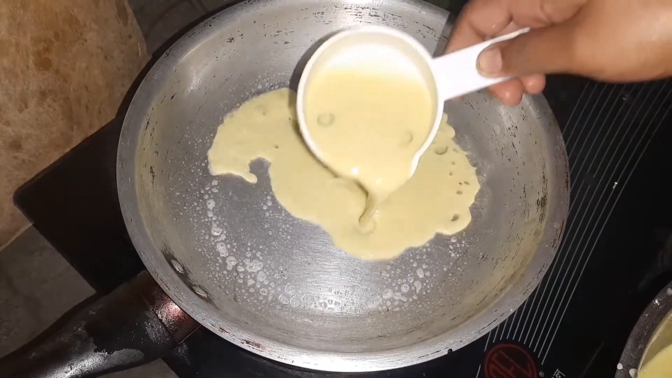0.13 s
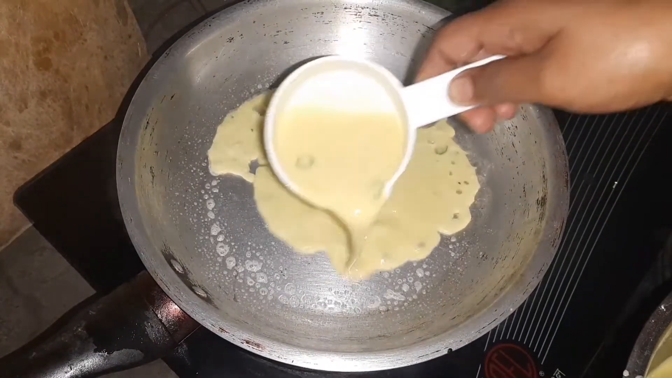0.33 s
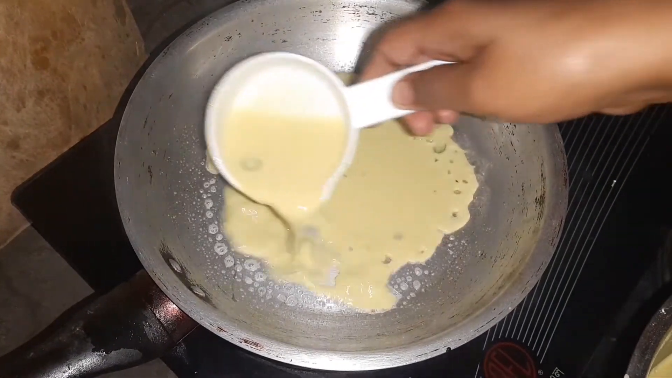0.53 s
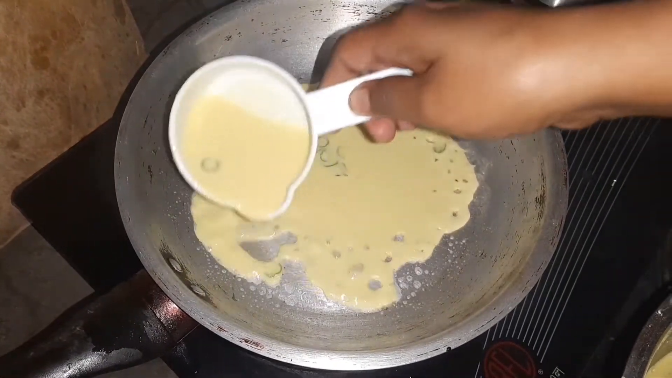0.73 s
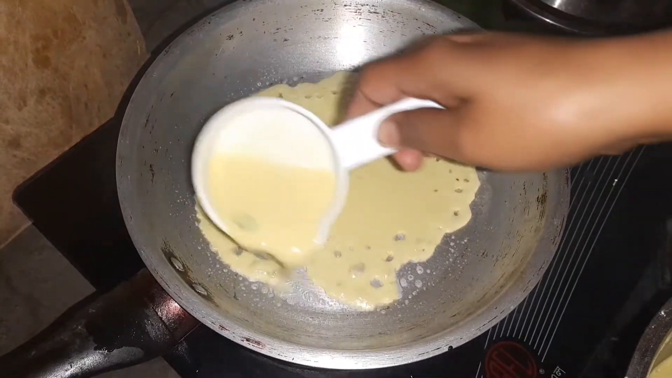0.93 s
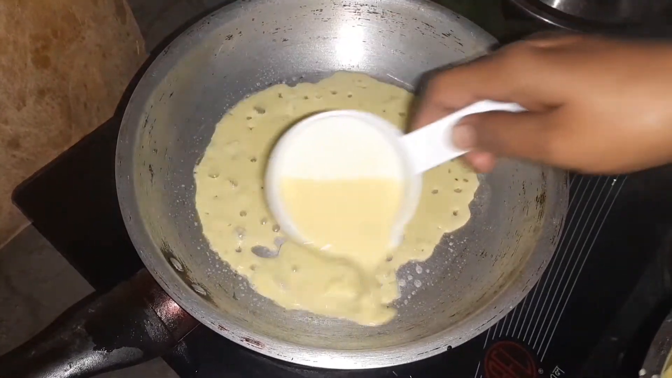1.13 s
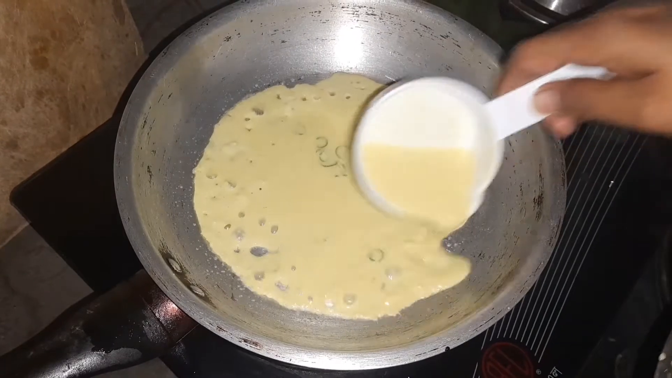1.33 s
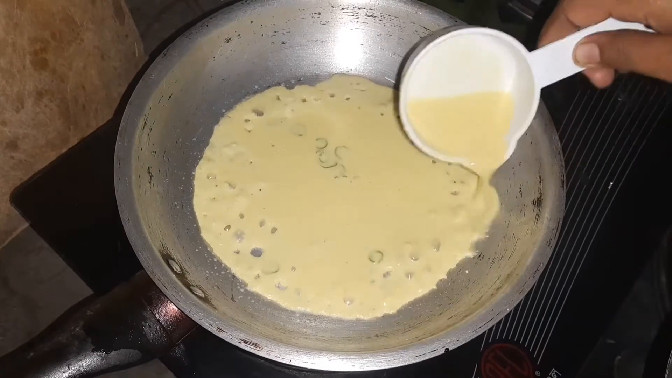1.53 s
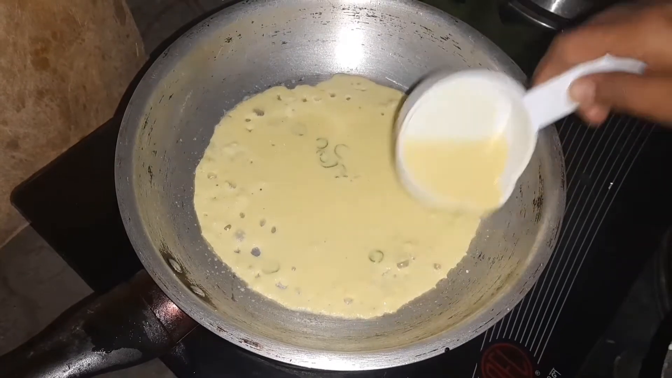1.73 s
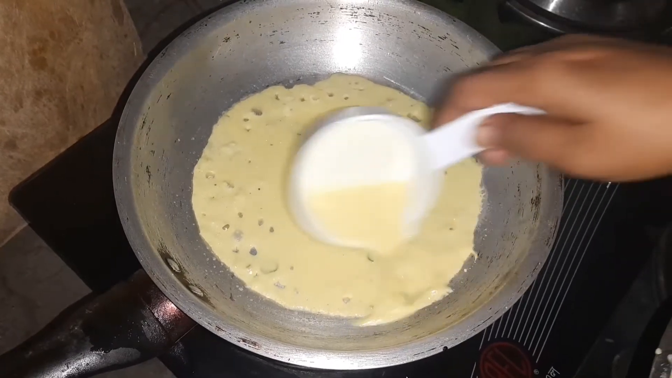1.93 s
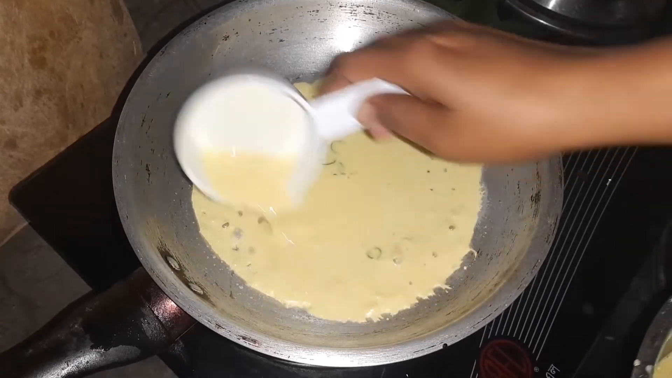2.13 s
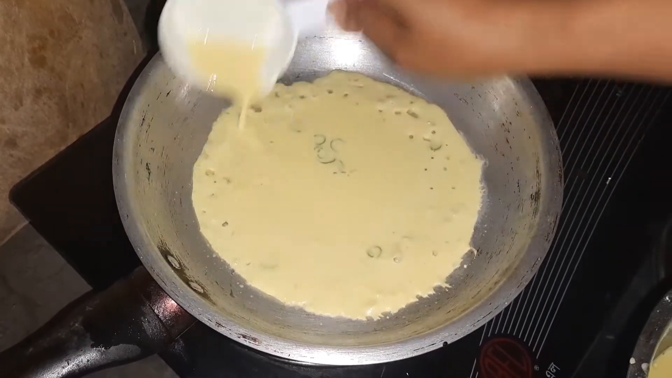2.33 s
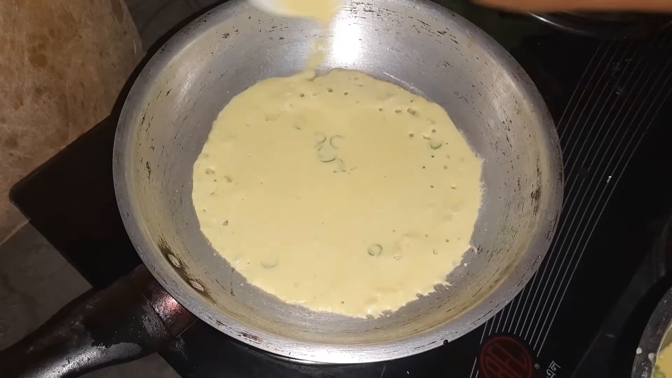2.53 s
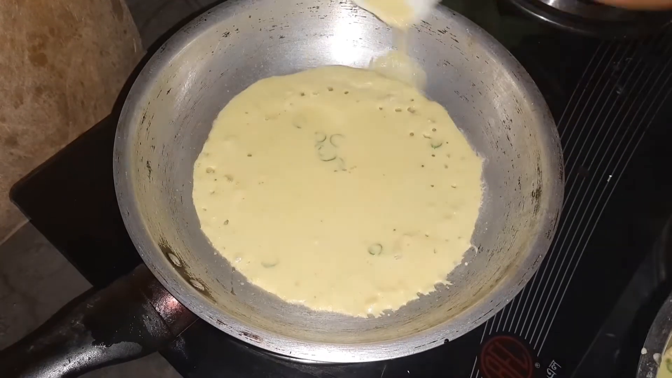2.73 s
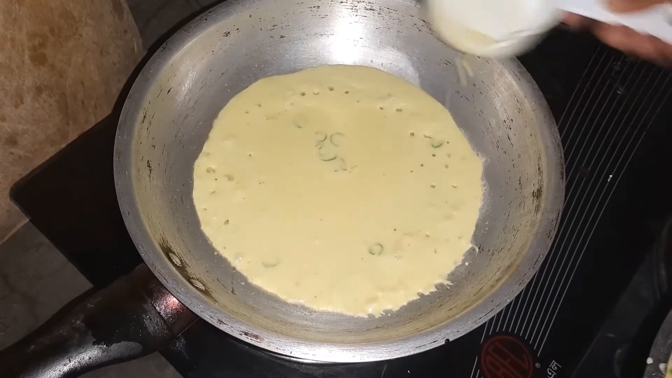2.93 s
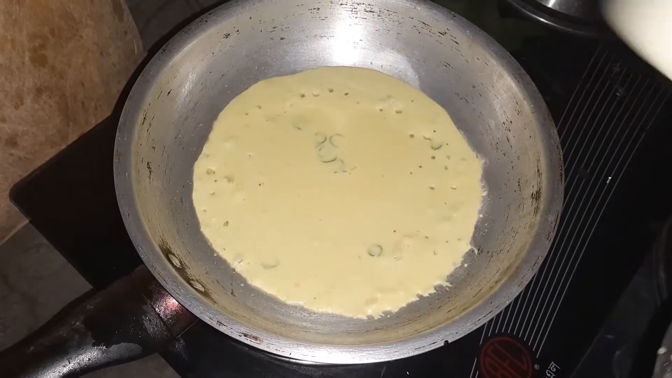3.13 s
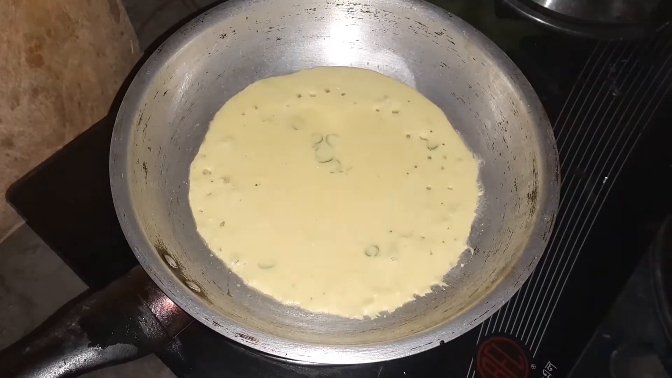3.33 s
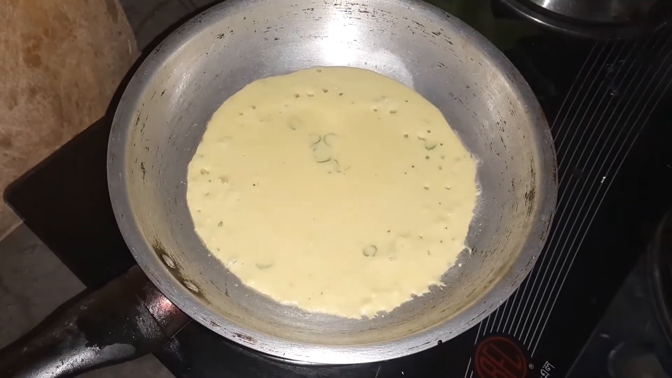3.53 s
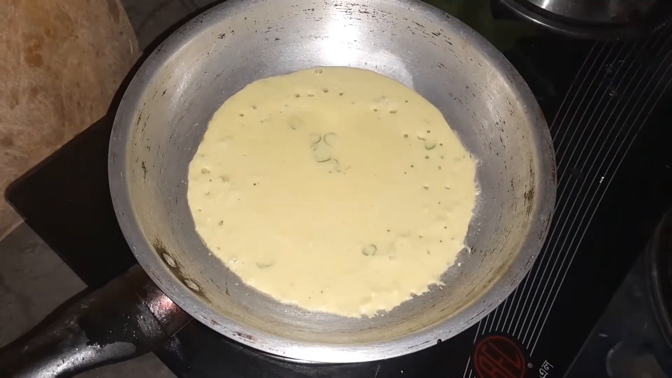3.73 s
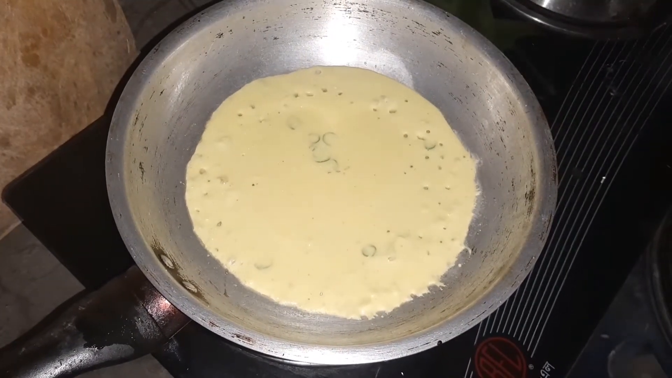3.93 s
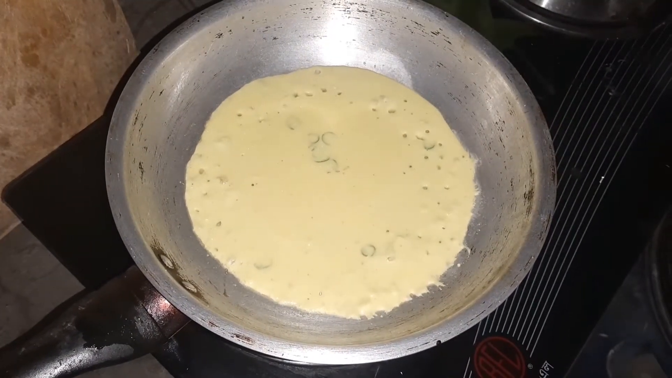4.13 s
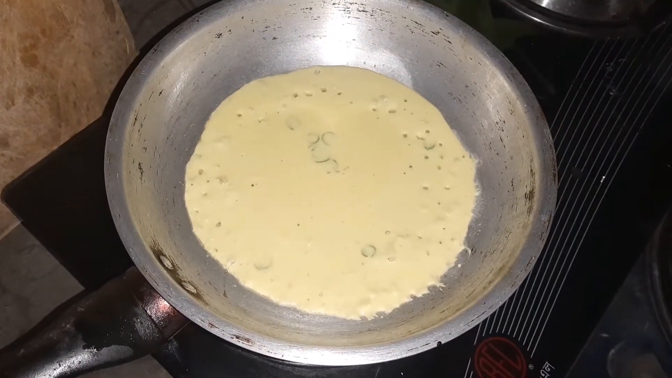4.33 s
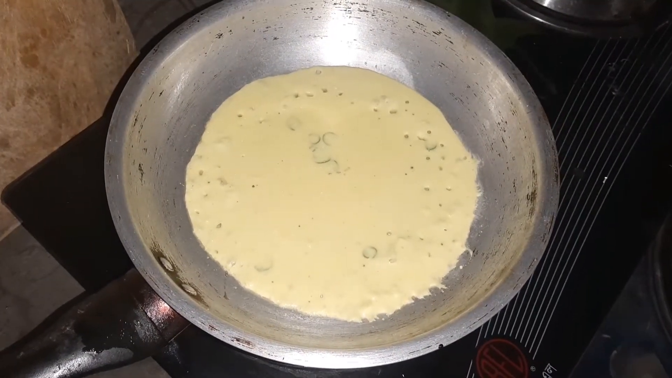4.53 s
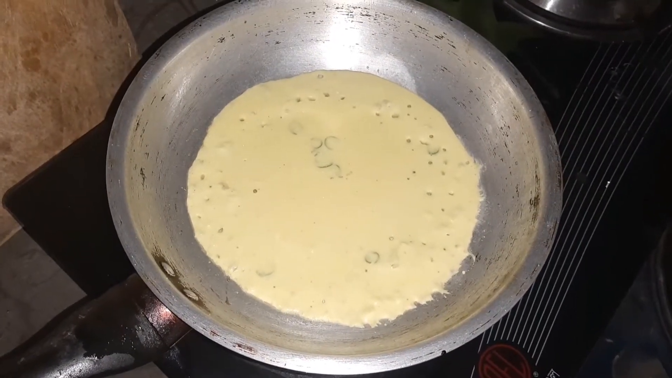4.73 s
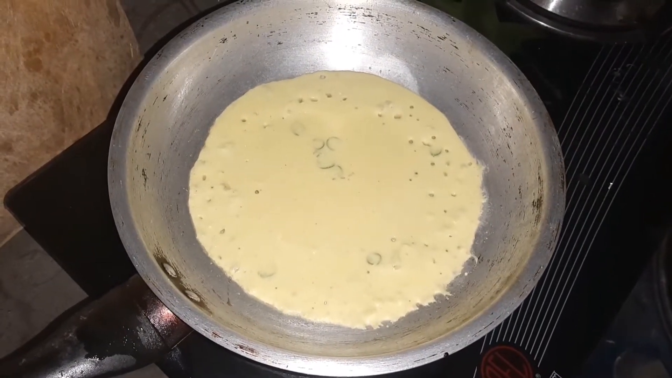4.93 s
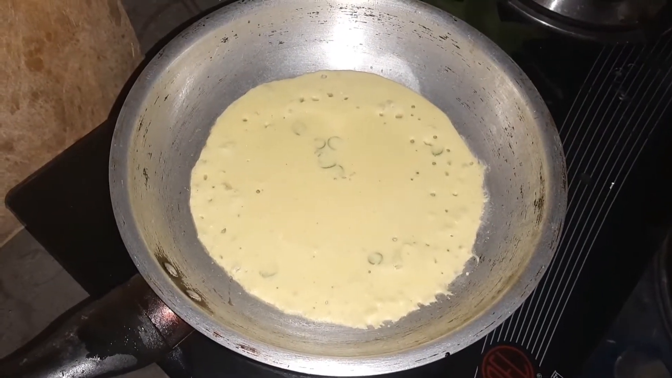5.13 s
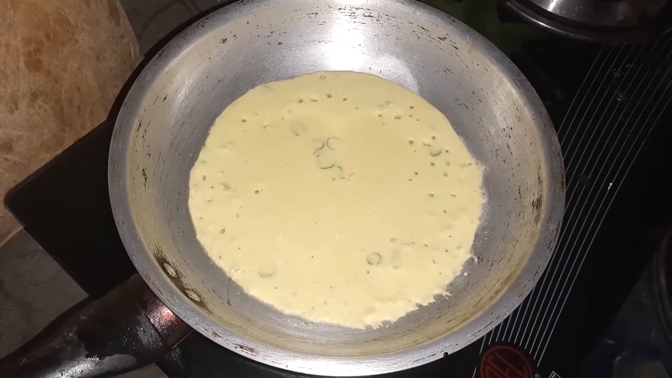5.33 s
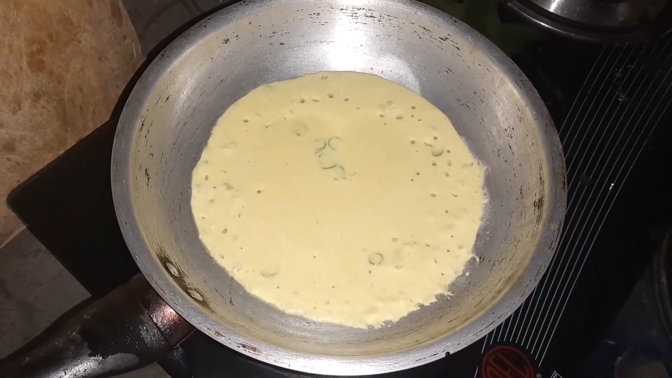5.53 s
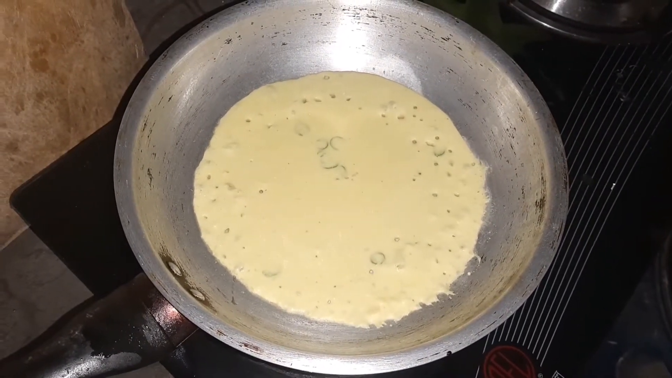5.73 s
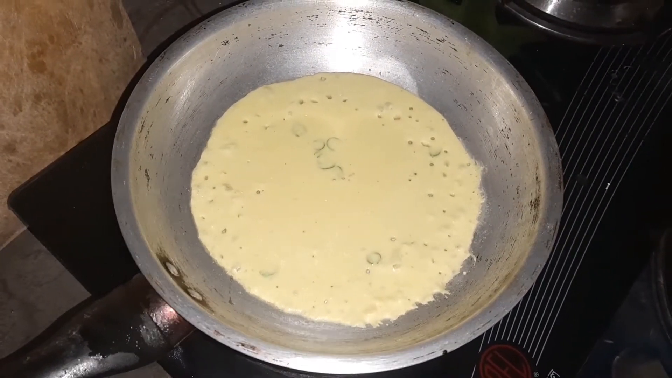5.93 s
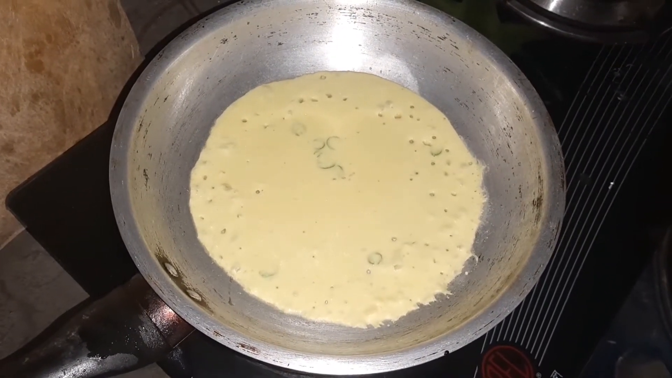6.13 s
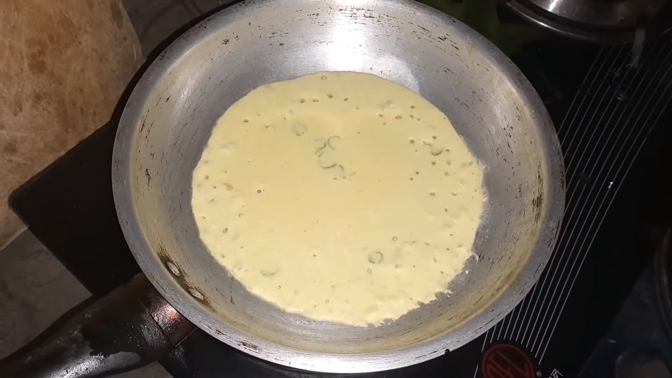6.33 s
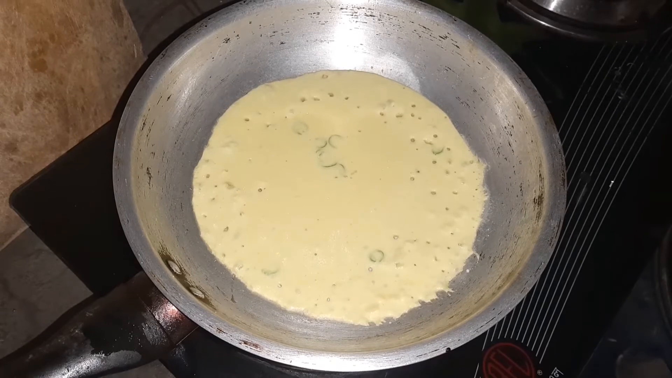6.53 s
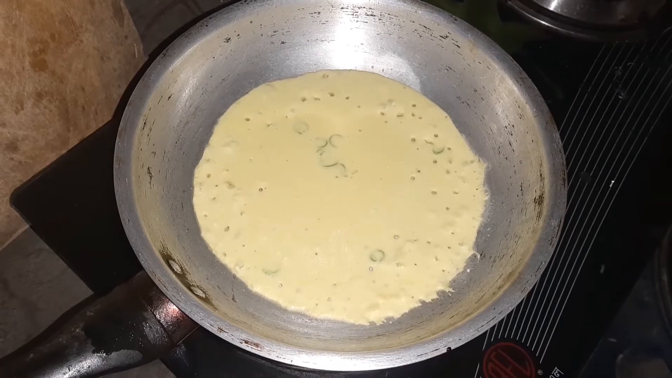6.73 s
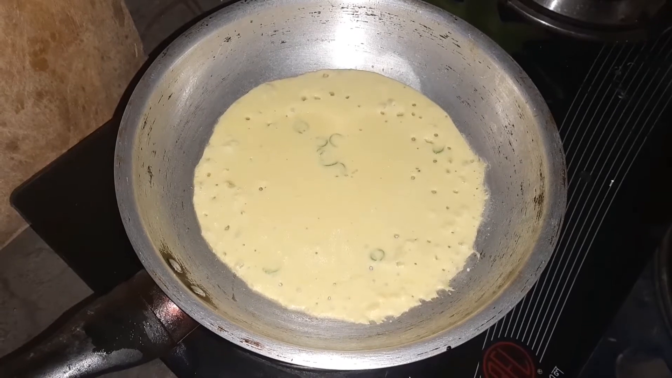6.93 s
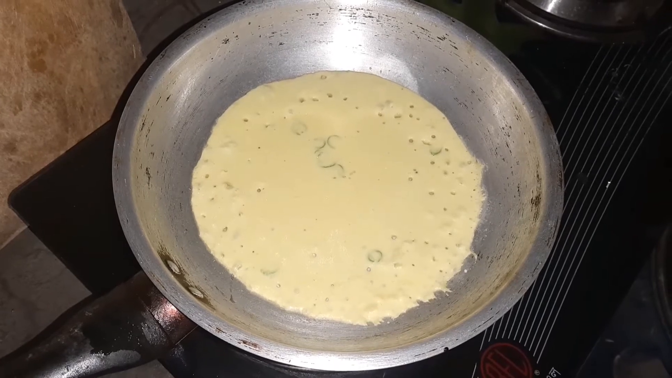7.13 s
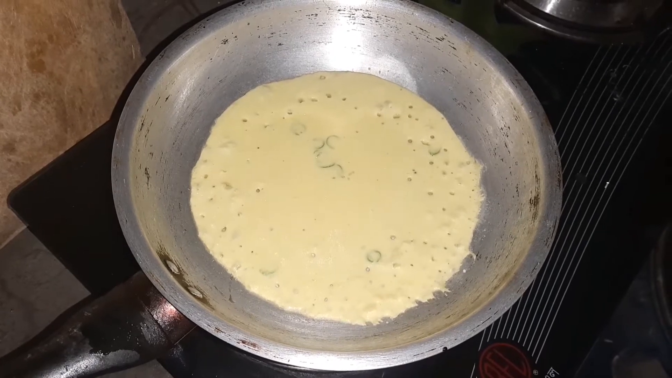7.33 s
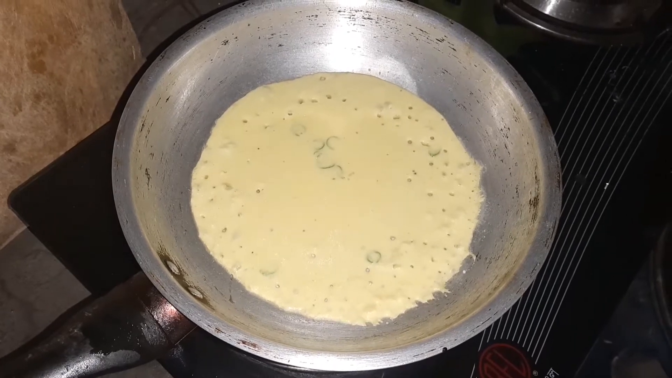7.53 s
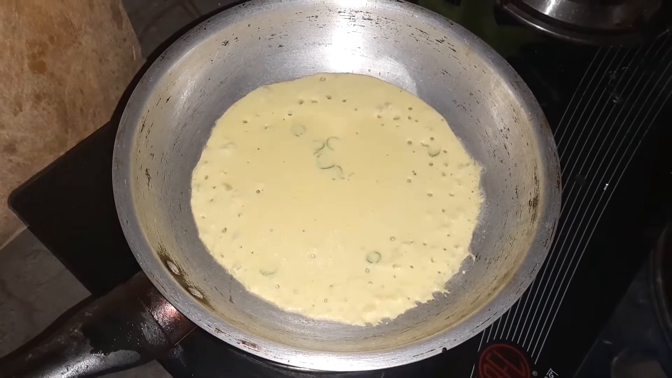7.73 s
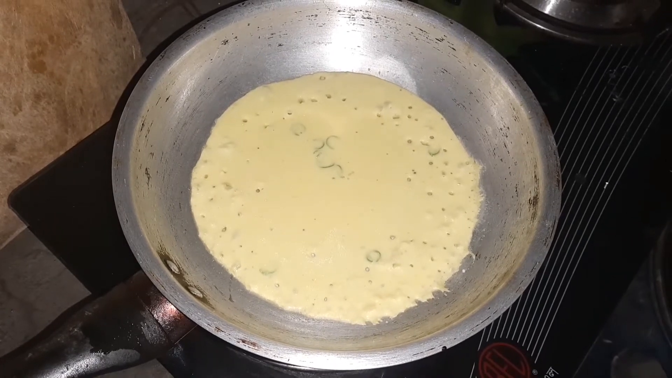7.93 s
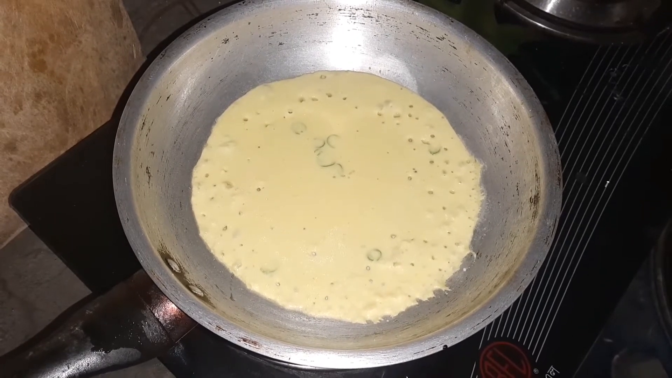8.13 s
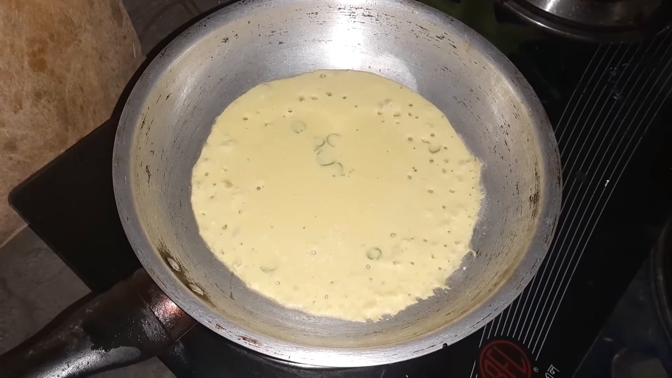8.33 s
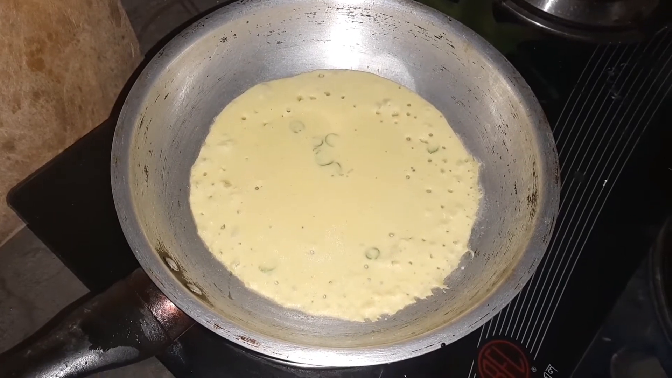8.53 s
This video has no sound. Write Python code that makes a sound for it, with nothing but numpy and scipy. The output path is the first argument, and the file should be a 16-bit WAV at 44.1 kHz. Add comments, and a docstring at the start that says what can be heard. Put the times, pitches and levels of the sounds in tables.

```python
"""A loud, bright sizzle: batter pours into a hot oiled steel pan in a small kitchen.
Countless steam bubbles burst, each a click and a puff. After the pour, dribbles flare up on bare metal;
then the batter sets and only fizzes, spits as steam pockets snap open, and vents one thin jet.
Something hollow and wooden bumps dully nearby, and a hand-held camera's case ticks over a faint hum."""
import sys
import numpy as np
from scipy import signal
from scipy.fft import rfft, irfft, next_fast_len
from scipy.io import wavfile
from scipy.ndimage import uniform_filter1d, map_coordinates

SR = 44100
rng = np.random.default_rng(int(sys.argv[2]) if len(sys.argv) > 2 else 0)


def unload_audio(sound):
    """Save the sound as a 16-bit wav file, at the path given as the first command line argument."""
    columns = np.transpose(np.atleast_2d(sound))
    # keep every value between -1 and 1, then stretch to whole-number steps
    steps = np.round(np.clip(columns, -1, 1) * 32767)
    wavfile.write(sys.argv[1], SR, steps.astype(np.int16))


N = 383669

# room tone: f/Hz, level/dB
HUM_EQ = [(20, -39), (45, -4), (75, -0.5), (120, -5), (200, -8.5), (300, -4.5), (420, -17), (1000, -9),
          (4000, -25), (15000, -34)]
# reverb time of the kitchen: f/Hz, T60/s
ROOM_DECAY = [(100, 0.74), (1000, 0.33), (5000, 0.069), (14000, 0.6)]
# modes of the hollow wooden body: f/Hz, bandwidth/Hz, level/dB
WOOD_MODES = [(72, 12, -9), (100, 10.4, -5), (170, 7.8, -8.5), (218, 18, -7.5), (249, 25, -7.5),
              (361, 39, -5), (600, 90, -15), (950, 44, -2)]
# dull blows on it: t/s, level/dB, low cut/Hz, high cut/Hz
BUMPS = [(5.379, -44.5, 70, 670), (5.403, -44, 60, 350), (5.43, -40.5, 50, 130), (5.470, -45, 60, 442),
         (5.641, -47.5, 168, 414), (5.679, -50.5, 135, 650)]
# dry ticks of the camera's case: t/s, level/dB, high cut/Hz
CASE_TICKS = [(3.769, -45.5, 910), (6.0161, -39, 2000), (6.0188, -44, 2200), (6.0215, -29, 2070),
              (6.122, -33.5, 1840), (6.7920, -24.5, 3840), (6.794, -35, 2550), (6.799, -30.5, 2490),
              (7.3175, -30.5, 3560), (7.351, -49.5, 500), (7.819, -49, 1200)]
# low thumps of the hand: t/s, level/dB, f/Hz
HAND_NUDGES = [(3.771, -55, 75.4), (6.024, -49, 85.5), (6.124, -50.5, 70), (7.822, -48.5, 80.4)]
# soft rubs of the hand: centre t/s, level/dB, width/s, f/Hz just above the band
HAND_RUBS = [(3.661, -65.5, 0.035, 366), (4.846, -72.5, 0.1, 353), (6.168, -73.5, 0.14, 392),
             (7.257, -70, 0.17, 370), (7.347, -62, .025, 420)]
# steam jet, first narrow, then spread: f/Hz, level/dB
JET_SQUEAL_EQ = [(7000, -35), (9000, 0), (11000, -35), (15000, -70)]
JET_HISS_EQ = [(2600, -27), (3300, 4), (4200, -1), (5500, -30),
               (7400, -9), (8400, 2), (9800, -1), (12000, -22)]
# steam pockets breaking through: t/s, snap level/dB, body relative to snap/dB
SPITS = [(2.3007, -36.5, -15), (2.8202, -37, -0.5), (2.9326, -32, -13), (3.6296, -34.5, -10),
         (3.641, -35, -11), (3.864, -42.5, -11), (4.2104, -44.5, -0.5), (4.4318, -48, -2.5),
         (4.619, -54, -2), (4.6508, -41, -17), (4.7403, -42, -12), (4.987, -44.5, -14), (5.014, -46.5, -24),
         (5.1931, -45.5, -28), (6.3875, -47, -27), (6.571, -48, -14), (6.6627, -48.5, -25),
         (6.9074, -48, -3), (6.9655, -47.5, -1.5), (7.1032, -52, -6), (7.3352, -37.5, -6.5),
         (7.3806, -47.5, -7), (7.5527, -47.5, -27), (8.041, -54.5, 0.5), (8.489, -52, -29),
         (8.548, -49, -34)]
# bright snap of a spit or an oil crack: f/Hz, level/dB
SNAP_EQ = [(1500, -48), (3200, 6), (4500, 10), (6300, 9), (7600, 2), (9300, 7), (12000, -15.5),
           (15700, -31)]
# midrange body of a spit: f/Hz, level/dB
SPLAT_EQ = [(150, -63), (400, -7), (1100, 6), (1600, 13), (2400, 12), (3300, -11), (6000, -33)]
# hiss under the stream from the ladle: t/s, level/dB
POUR_HISS = [(0.0, -32.5), (0.38, -34), (0.51, -31), (1.5, -33), (1.87, -40.5), (1.88, -37.5),
             (2.31, -43.5), (2.33, -45.5)]
# bubbling of the thick pool it feeds: t/s, level/dB
POUR_BUBBLING = [(0.0, -45), (0.55, -45.5), (1.26, -52), (1.53, -51), (1.82, -57.5), (1.97, -53.5),
                 (2.34, -63.5)]
# dribbles flaring on bare metal: t/s, length/s, hiss level/dB, trapped steam level/dB, its build-up/s
FLARES = [(2.398, 0.18, -32, -51, 0.4), (4.045, 0.053, -53.5, -72, 0.04)]
# tiny bubbles in fresh batter: f/Hz, level/dB
FIZZ_FRESH_EQ = [(1500, -29.5), (2300, -25), (2900, -4.5), (3500, 1), (4200, 1.5), (5500, -2.5),
                 (6500, -6.5), (7500, -7.5), (8400, -7.5), (9200, -6.5), (10500, -14), (12500, -24),
                 (15600, -37.5)]
# tiny bubbles on bare metal: f/Hz, level/dB
FIZZ_BARE_EQ = [(1800, -35), (2300, -9), (2850, -3), (3300, -6), (3750, 0.5), (4300, -3), (5000, 0),
                (6400, -2.5), (7400, -10), (8500, -6.5), (9200, -3), (10500, -10.5), (13000, -23),
                (15600, -32)]
# tiny bubbles under setting batter: f/Hz, level/dB
FIZZ_SET_EQ = [(1900, -20), (2900, -6), (3600, -5), (4400, 2), (5600, 0.5), (6500, 0.5), (7100, -7),
               (7600, -8.5), (8600, -6.5), (9700, -5), (11000, -10.5), (12200, -18.5), (15500, -28)]
# larger bubbles in fresh batter: f/Hz, level/dB
SPUTTER_FRESH_EQ = [(900, -44.5), (1100, -5), (1300, 0.5), (1500, 4), (1650, -3), (1790, 1.5), (2080, -6.5),
                    (2300, -2), (2600, -3.5), (3200, -11), (5000, -50.5)]
# larger bubbles under setting batter: f/Hz, level/dB
SPUTTER_SET_EQ = [(1000, -33.5), (1300, -10), (1520, -3.5), (1850, -4), (2120, -1), (2500, -4), (2900, -16),
                  (4500, -53)]
# deep bubbles in thick batter: f/Hz, level/dB
BUBBLING_EQ = [(30, -65), (110, -17.5), (170, -10), (240, -12), (340, -2.5), (470, -1.5), (590, -1.5),
               (680, -2), (790, -4), (930, 3), (1050, -7), (1400, -14), (3000, -82)]
# simmering fizz, sputter and bubbling: level when wet/dB, exponent of the moisture left
SIMMER = [(-60.5, 0.27), (-65, 0.77), (-71.5, 1.22)]

FLARE_RISE_S, QUENCH_DB_PER_S = 0.066, 36  # a flare rises, then dies as the batter cools the metal
LINGER_DB, LINGER_DB_PER_S = -11.5, 13.5  # a weaker part boils on for longer
DRY_S, TOP_HZ = 9.62, 15750  # moisture runs out; band limit


def amp(db):
    """Decibels to gain."""
    return 10 ** (np.asarray(db) / 20)


def unit(x):
    """Scale to rms 1."""
    return x / np.sqrt(np.mean(x ** 2) + 1e-20)


def along(points, hz):
    """Read a curve of f/Hz, value on a log frequency axis."""
    f, v = np.transpose(points)
    return np.interp(np.log(hz + 1), np.log(f + 1), v)


def wobble(rate):
    """Smooth random modulation, rate knots a second."""
    return map_coordinates(rng.standard_normal(int(N * rate / SR) + 4), [np.arange(N) * rate / SR])


def swell(start, rise, length, fade_db_per_s):
    """Envelope: linear attack, hold until length after the start, then a fade."""
    age = np.arange(N) / SR - start
    return np.clip(age / rise, 0, 1) * amp(-fade_db_per_s * np.maximum(age - length, 0))


def add(track, s, sound):
    """Mix a sound into the track at time s."""
    start = round(s * SR)
    track[start:start + len(sound)] += sound[:N - start]


def blend(share, a, b):
    """Crossfade from b (share 0) to a (share 1) at steady power."""
    likeness = np.mean(unit(a) * unit(b))
    return (share * a + (1 - share) * b) / np.sqrt(1 - 2 * share * (1 - share) * (1 - likeness))


def eq(x, curve, size=4096):
    """Minimum-phase EQ of unit energy: the curve sets only the colour."""
    cepstrum = irfft(np.log(amp(along(curve, np.fft.rfftfreq(size, 1 / SR)))))
    fold = 1 - np.sign(np.arange(size) - size // 2)
    fold[0] = 1
    response = irfft(np.exp(rfft(cepstrum * fold)))
    return signal.fftconvolve(x, response / np.linalg.norm(response))[:len(x)]


def passed(x, hz, kind, order=2):
    """Causal low-pass or high-pass."""
    return signal.sosfilt(signal.butter(order, hz, kind, fs=SR, output="sos"), x)


def room_tone():
    """A faint bed of low, humming noise."""
    return amp(-79.5) * eq(rng.standard_normal(N), HUM_EQ)


def kitchen_reverb(x):
    """The room's short diffuse tail, after a 6 ms pre-delay."""
    hz, t, noise = signal.stft(rng.standard_normal(SR // 2), SR, nperseg=256)
    decay = amp(-60 * t / along(ROOM_DECAY, hz)[:, None])
    tail = signal.istft(noise * decay, SR, nperseg=256)[1]
    return signal.fftconvolve(np.pad(x, (260, 0)), tail / np.linalg.norm(tail))[:N]


def wood_bumps():
    """Soft rattling blows on a hollow wooden body; each reaches only a range of its modes."""
    out, t = np.zeros(N), np.arange(SR // 2) / SR
    for s, db, low_hz, high_hz in BUMPS:
        ring = 0
        for hz, width, level in WOOD_MODES:
            phase = rng.uniform(0, 2 * np.pi)
            ring += amp(level) * np.exp(-np.pi * width * t) * np.sin(2 * np.pi * hz * t + phase)
        rattle = 1.8 * amp(-60 * t / .22) * rng.standard_normal(len(t))
        body = passed(ring + rattle, low_hz, "high", order=3)
        add(out, s, amp(db) * passed(body, high_hz, "low"))
    return out


def camera_handling():
    """The case gives in single rounded pulses; the hand nudges it with a low thump and rubs softly."""
    out, t = np.zeros(N), np.arange(SR // 4) / SR
    for s, db, hz in CASE_TICKS:
        push = (t == 0) + .014 * amp(-60 * t / .05) * rng.standard_normal(len(t))
        rounded = passed(push, hz, "low", order=4)
        tick = passed(rounded, 0.11 * hz, "high", order=1)
        add(out, s, amp(db) * tick / np.abs(tick).max())
    for s, db, hz in HAND_NUDGES:
        add(out, s, amp(db - 60 * t / 0.057) * np.sin(2 * np.pi * hz * t))
    for s, db, width, hz in HAND_RUBS:
        dull = passed(rng.standard_normal(len(t)), 0.89 * hz, "low", order=4)
        friction = unit(passed(dull, 0.96 * hz, "high", order=4))
        stroke = np.exp(-2 * ((t - t.mean()) / width) ** 2)
        add(out, s - t.mean(), amp(db) * stroke * friction)
    return out


def steam_jet(start_s=7.55, spread_s=0.38):
    """Steam escaping through a pinhole starts as a narrow squeal and spreads into a hiss."""
    narrow = np.clip(.8 - (np.arange(N) / SR - start_s) / spread_s, 0, 1)
    flow = amp(-63.5) * swell(start_s, rise=0.09, length=0.28, fade_db_per_s=14)
    steam = rng.standard_normal(N)
    return flow * blend(narrow, eq(steam, JET_SQUEAL_EQ), eq(steam, JET_HISS_EQ))


def spits(blow_off=0.53):
    """Each pocket snaps open with a click; a share of its steam blows off more slowly."""
    snaps, splats, t = np.zeros(N), np.zeros(N), np.arange(SR // 8) / SR
    click = 8 * (1 - blow_off) * (t == 0)
    for s, db, body_db in SPITS:
        pop = click + blow_off * amp(-60 * t / .055) * rng.standard_normal(len(t))
        add(snaps, s, amp(db) * pop)
        add(splats, s, amp(db + body_db) * pop)
    return eq(snaps, SNAP_EQ) + eq(splats, SPLAT_EQ)


def bursts(rate, spread_db, puff, puff_t60):
    """Bubbles bursting at a rate a second, rms 1: each a click followed by a puff of steam."""
    chance = np.clip(rate / SR, 1e-5, 1)
    sizes = amp(spread_db * np.minimum(rng.standard_normal(N), 2))
    clicks = unit((rng.random(N) < chance) * sizes / np.sqrt(chance)) * rng.choice([-1, 1], N)
    power_decay = amp(-120 * np.arange(SR // 10) / SR / puff_t60)
    steam_power = np.abs(signal.fftconvolve(clicks ** 2, power_decay / power_decay.sum())[:N])
    return unit(clicks + puff * np.sqrt(steam_power) * rng.standard_normal(N))


def wandering(x, depth_db):
    """Boiling spots come and go around the rim, so the colour of the hiss drifts."""
    bands = signal.stft(x, nperseg=512)[2]
    drift = rng.standard_normal(bands.shape)
    for _ in range(2):
        drift = uniform_filter1d(uniform_filter1d(drift, size=8, axis=0), size=70, axis=1)
    return unit(signal.istft(bands * amp(depth_db * unit(drift)), nperseg=512)[1][:N])


def boiling_levels():
    """Pour, flares and simmer add in power: dB of fizz, sputter, bubbling, and the bare-metal share."""
    t = np.arange(N) / SR
    release = amp(-LINGER_DB_PER_S * np.maximum(t - POUR_HISS[-1][0], 0))
    hiss, deep = ((amp(np.interp(t, *np.transpose(rows))) * release) ** 2 + 1e-14
                  for rows in (POUR_HISS, POUR_BUBBLING))
    on_metal = 0.35 * hiss  # part of the stream meets bare metal
    for s, length, db, steam_db, build_up in FLARES:
        quick, slow = ((amp(db) * swell(s, FLARE_RISE_S, length, fade)) ** 2
                       for fade in (QUENCH_DB_PER_S, LINGER_DB_PER_S))
        flare = quick + amp(LINGER_DB) ** 2 * np.abs(slow - quick)
        trapped = (amp(steam_db) * swell(s, build_up, build_up, fade_db_per_s=47)) ** 2
        on_metal += quick
        hiss += flare
        deep += trapped + amp(-26) ** 2 * flare
    bare = np.clip(on_metal / hiss, 0, 1)
    # a thin film on bare metal sputters less; deep bubbles sputter as they burst
    sputtering = amp(-8.5 - 5 * bare) ** 2 * hiss + amp(0.5) ** 2 * deep
    moisture = np.maximum(1 - t / DRY_S, 1e-3)
    simmer = [(amp(db + 1.1 * wobble(7.7)) * moisture ** exponent) ** 2 for db, exponent in SIMMER]
    levels_db = 10 * np.log10(np.add((hiss, sputtering, deep), simmer))
    return *levels_db, bare


def bubbling(level_db, vigour):
    """The low gurgle: thick batter that bubbles hard holds most of the deepest bubbles."""
    deep = eq(bursts(4500 * vigour, spread_db=3, puff=1.2, puff_t60=0.05), BUBBLING_EQ)
    thick = np.clip((level_db + 54) / 10, 0, 1)
    return amp(level_db) * blend(thick, deep, passed(deep, 343, "high", order=1))


def sputter(level_db, vigour, fresh):
    """The midrange: larger bubbles burst, their colour drifting once the batter sets."""
    large = bursts(5000 * vigour, spread_db=5.0, puff=0.96, puff_t60=0.065)
    setting = wandering(eq(large, SPUTTER_SET_EQ), depth_db=1.8)
    return amp(level_db) * blend(fresh, eq(large, SPUTTER_FRESH_EQ), setting)


def fizz(level_db, vigour, fresh, bare):
    """The top end: tiny bubbles hiss, thinner and higher as the underside sets; oil films crack."""
    tiny = bursts(15000 * vigour, spread_db=6.5, puff=0.83, puff_t60=0.03)
    poured = blend(bare, eq(tiny, FIZZ_BARE_EQ), eq(tiny, FIZZ_FRESH_EQ))
    fine = bursts(40000 * vigour, spread_db=4.5, puff=0.79, puff_t60=0.053)
    setting = wandering(eq(fine, FIZZ_SET_EQ), depth_db=1.6)
    oil_cracks = eq(bursts(22, spread_db=2.5, puff=.65, puff_t60=.02), SNAP_EQ)
    return amp(level_db) * (blend(fresh, poured, setting) + amp(-9.3 - 9.2 * fresh) * oil_cracks)


def sizzle():
    """Three layers of steam bubbles in the batter; harder boiling means more of them."""
    fizz_db, sputter_db, bubbling_db, bare = boiling_levels()
    vigour = amp(.8 * (fizz_db + 32.0))  # scales the bubble rates
    surge_db = 0.37 * wobble(15) + 0.5 * wobble(50)
    fresh = np.clip((fizz_db + 58.5) / 12, 0, 1)  # loud fizz sounds fresh (1), quiet fizz set (0)
    highs = fizz(fizz_db + surge_db, vigour, fresh, bare)
    mids = sputter(sputter_db + surge_db, vigour, fresh)
    lows = bubbling(bubbling_db, vigour)
    return passed(highs + mids + lows, 75, "high")


def scene():
    """Everything sits close and centred, almost mono."""
    pan = sizzle() + spits() + steam_jet()
    knocks = camera_handling() + wood_bumps()
    reverb = amp(-8.0) * kitchen_reverb(pan) + amp(-9.5) * kitchen_reverb(passed(knocks, 960, "low"))
    mid = pan + knocks + reverb + room_tone()
    side = amp(-29) * kitchen_reverb(mid)
    return np.array([mid + side, mid - side]) * amp([[-.1], [.1]])


def record(dry):
    """A brick-wall high cut at the camera's band limit."""
    size = next_fast_len(N + SR // 2)
    passband = np.fft.rfftfreq(size, 1 / SR) < TOP_HZ
    return irfft(rfft(dry, size) * passband, size)[:, :N]


dry = scene()
out = record(dry)
unload_audio(out)
```